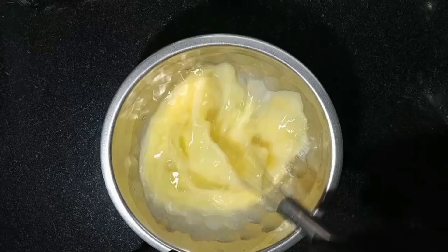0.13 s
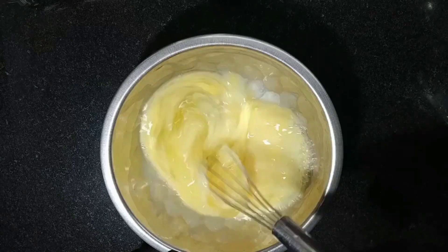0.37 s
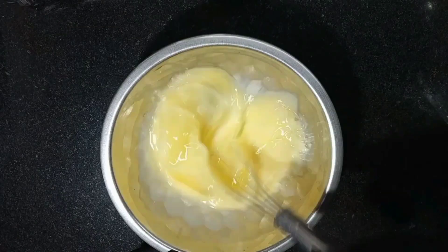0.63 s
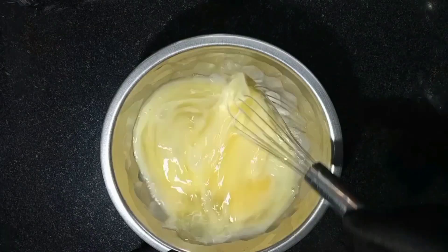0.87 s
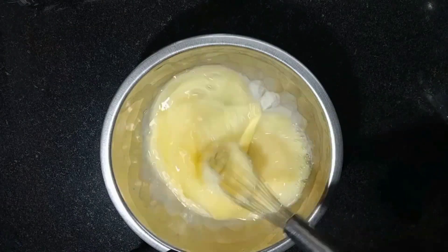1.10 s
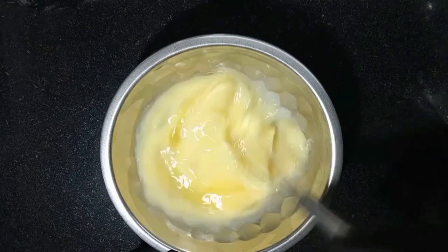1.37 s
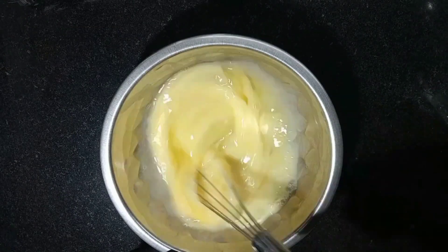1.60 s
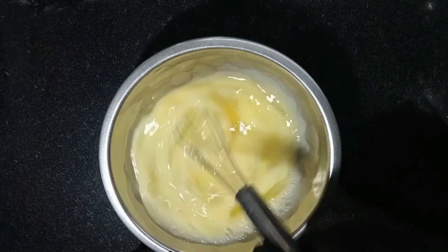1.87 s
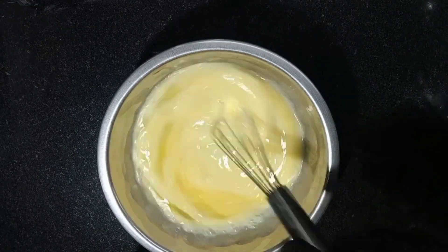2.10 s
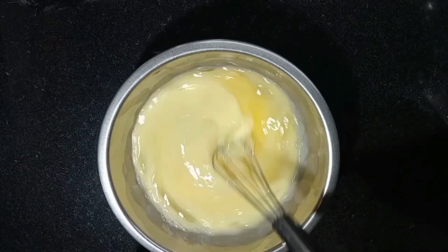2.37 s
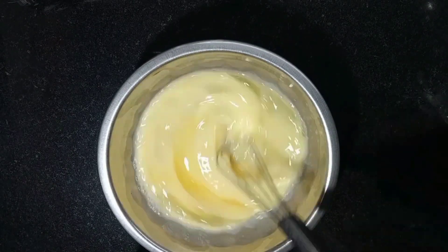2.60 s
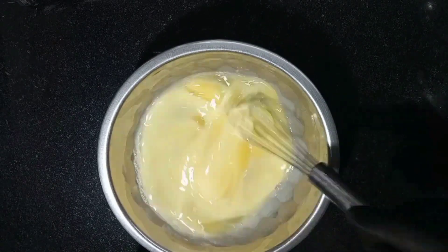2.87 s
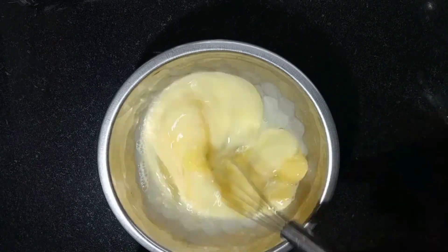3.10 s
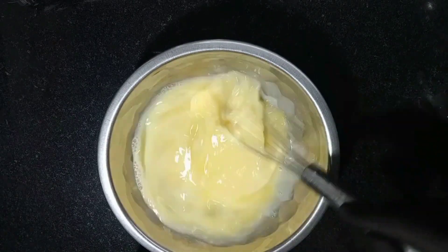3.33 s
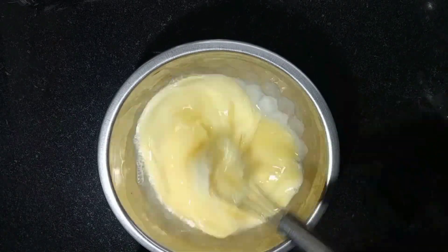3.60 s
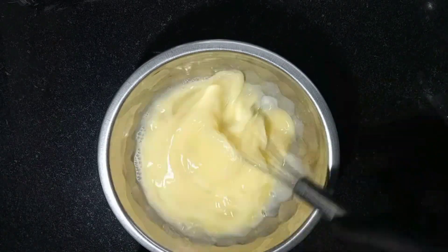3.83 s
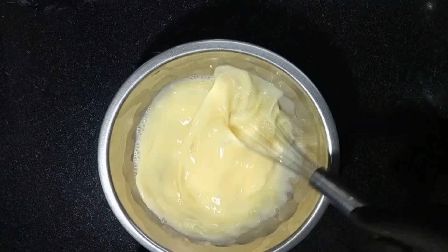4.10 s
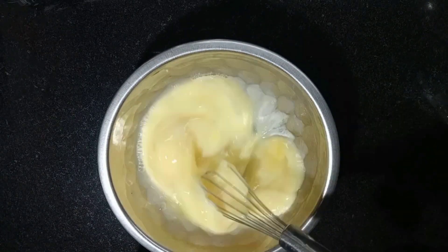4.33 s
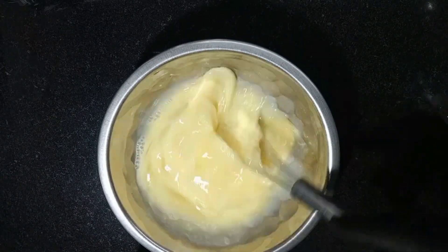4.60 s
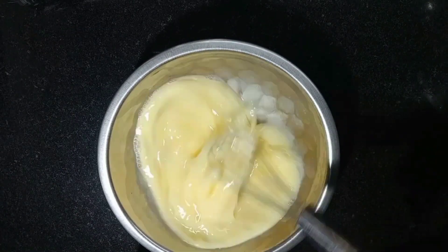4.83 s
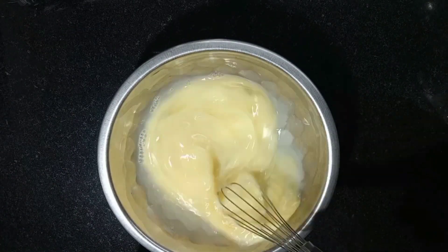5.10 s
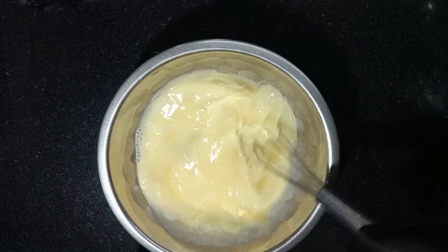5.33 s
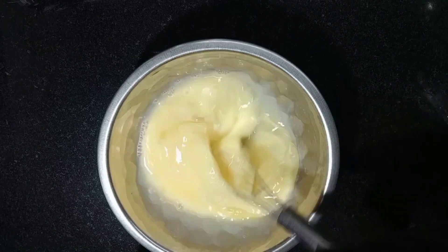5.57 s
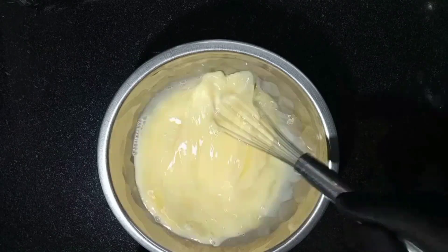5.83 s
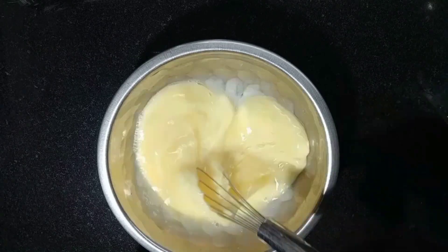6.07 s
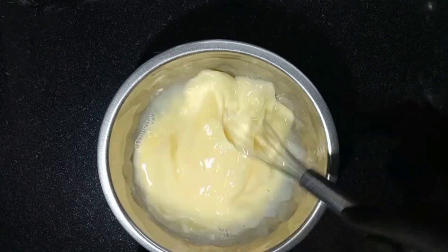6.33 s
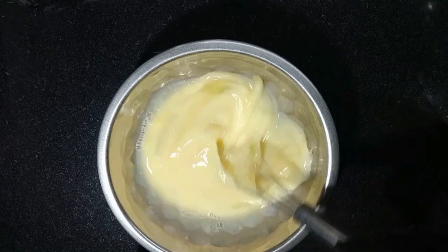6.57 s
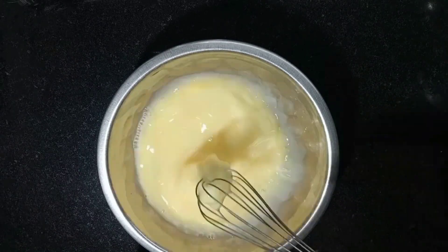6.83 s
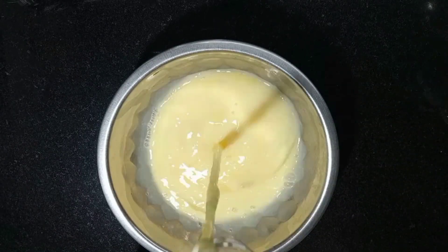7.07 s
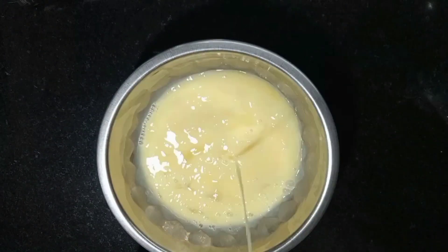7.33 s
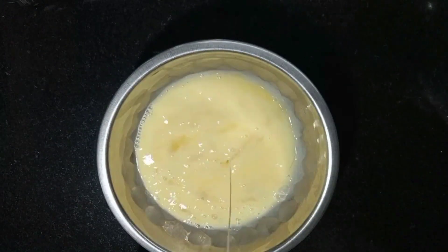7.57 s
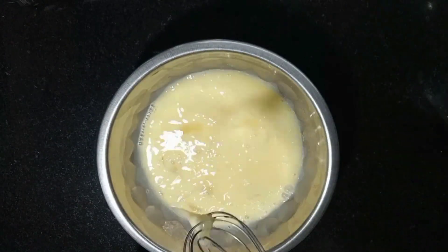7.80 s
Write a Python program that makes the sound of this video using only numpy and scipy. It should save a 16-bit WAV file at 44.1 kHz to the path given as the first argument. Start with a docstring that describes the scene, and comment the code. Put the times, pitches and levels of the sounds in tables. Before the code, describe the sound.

One nearby microphone hears uneven whisk strokes landing and dragging on a thin metal bowl, bright and rattling, mixed with short liquid pops and fine bubbling. Stirring stops for most of a second, returns firmly, then fades as the whisk is lifted. Faint handling, tiny wire ticks and a brief high hiss close it, with a short small-room tail throughout.

```python
"""In a small kitchen, a wire whisk beats eggs in a metal bowl. In each stroke the wires land and drag over
the wall; uneven bursts of noise ring the bowl's modes. Trapped air pockets plop as short sine tones and
froth bursts as tiny grains. The room answers each of them with a short tail of fading noise.
Below lie a growing hum, room noise, a rumble and a rustle that follow the stirring. At the end the whisk
is lifted: soft rustles, a few ticks and a brief hiss remain."""
import sys
import numpy as np
from scipy import signal
from scipy.fft import rfft, irfft
from scipy.io import wavfile
from scipy.ndimage import uniform_filter1d

SR = 44100
rng = np.random.default_rng(int(sys.argv[2]) if len(sys.argv) > 2 else 0)


def amplitude_ratio(level_db):
    """Convert a level in decibels to the matching linear amplitude (field) ratio."""
    exponent = np.asarray(level_db, float) / 20
    return 10 ** exponent


def materialize(psi):
    """Save the field psi as 16-bit PCM at rate SR to the path in sys.argv[1].

    A 1-D psi becomes a single channel; in a 2-D psi each row is a channel.
    """
    bounded = np.clip(np.atleast_2d(psi).T, -1, 1)
    quanta = np.round(bounded * 32767).astype(np.int16)
    wavfile.write(sys.argv[1], SR, quanta)


N = 350154

# Strokes of the whisk. Each row: start in seconds, peak level in dB, time the wires stay on the wall in seconds.
STROKES = [(0.0034, -31.5, 0.033), (0.11, -17.5, 0.033), (0.2753, -22, 0.029), (0.3052, -20.5, 0.038),
           (0.593, -20.5, 0.051), (0.7572, -27, 0.052), (0.837, -38, 0.045), (0.8981, -17, 0.062),
           (1.05, -23, 0.041), (1.2031, -19.5, 0.058), (1.354, -26, 0.035), (1.4904, -15, 0.038),
           (1.704, -30.5, 0.072), (1.7539, -25.5, 0.034), (1.8441, -38, 0.039), (1.907, -34.5, 0.81),
           (1.9703, -28.5, 0.04), (2.008, -34.5, 0.08), (2.1575, -36, 0.058), (2.38, -45.5, 0.028),
           (3.046, -26, 0.08), (3.2023, -27, 0.068), (3.3595, -19.5, 0.043), (3.4999, -13, 0.056),
           (3.6574, -23.5, 0.058), (3.8191, -23, 0.06), (3.844, -24, 0.025), (3.9715, -22, 0.057),
           (4.1112, -24, 0.026), (4.123, -23, 0.047), (4.15, -25, 0.035), (4.278, -18, 0.033),
           (4.3052, -23.5, 0.019), (4.371, -40.5, 0.11), (4.424, -21.5, 0.053), (4.5767, -20.5, 0.056),
           (4.734, -15.5, 0.055), (4.8865, -17.5, 0.027), (4.8991, -23.5, 0.069), (5.0441, -21.5, 0.032),
           (5.1434, -36.5, 0.02), (5.359, -31, 0.032), (5.667, -18, 0.036), (5.826, -23.5, 0.079),
           (5.8387, -16.5, 0.022), (5.9943, -17, 0.024), (6.028, -28, 0.03), (6.1752, -26.5, 0.041),
           (6.3647, -34, 0.068), (6.501, -33, 0.041), (6.5344, -33.5, 0.03), (6.8196, -44, 0.031)]
# Single wires touching the wall. Each row: start in seconds, peak level in dB.
TICKS = [(0.1046, -26), (0.232, -38), (0.417, -51.5), (0.5351, -27), (0.555, -48), (0.587, -42),
         (0.714, -44.5), (1.0346, -41), (1.1699, -31.5), (1.6631, -37), (2.576, -60), (2.612, -65),
         (2.81, -56), (2.886, -55), (3.081, -32), (3.346, -31.5), (3.8105, -39), (4.526, -39),
         (4.5627, -23.5), (4.6783, -33), (4.836, -35.5), (5.188, -33), (5.207, -34.5), (5.221, -43),
         (5.3022, -40.5), (5.34, -30), (5.413, -43), (5.4968, -41), (5.5518, -43.5), (5.938, -50),
         (6.0867, -45), (6.237, -46), (6.413, -54), (6.4929, -38), (6.5956, -50.5), (6.8392, -45),
         (7.319, -49.5), (7.358, -53), (7.5642, -41), (7.742, -54)]
# Where the wires meet the bowl, over time. Each row: time in seconds, bottom ring against the wall in dB,
# brightness in dB per octave.
BOWL_CONTACT = [(0.1, -20, 0.64), (1.8, -20.5, 1.5), (3.05, -19, 1.5), (5.2, -22, -1), (5.7, -18.5, -0.06)]
# Air pockets closing in the batter. Each row: start in seconds, level in dB, starting pitch in Hz.
AIR_POCKETS = [(0.115, -42, 478), (0.2474, -26.5, 1340), (0.462, -36.5, 2700), (0.697, -33.5, 1730),
               (0.8985, -19.5, 1806), (1.17, -13, 2824), (1.203, -31, 1690), (1.3212, -18.5, 3386),
               (1.452, -32, 2750), (3.666, -16, 1763), (3.914, -35, 1850), (4.1088, -20, 1413),
               (4.413, -27.5, 1100), (4.5618, -17.5, 1430), (4.7293, -14, 1050), (4.837, -20.5, 1404),
               (4.8902, -13, 1034), (5.0445, -24.5, 990), (5.147, -32.5, 1082), (5.59, -30, 2800),
               (5.667, -34, 487), (5.777, -33.5, 1700), (5.827, -21, 1168), (6.112, -39.5, 1730),
               (6.188, -26, 1143), (6.289, -38.5, 1710), (6.77, -28, 2860)]
# Low ringing modes of the bowl's bottom. Each row: pitch in Hz, strength in dB.
BOTTOM_MODES = [(470, -3), (576, -6), (620, -1), (920, 5.5)]
# Ringing modes of the wall and the wires. Each row: pitch in Hz, strength in dB.
WALL_MODES = [(1346, -3.5), (1668, 0.5), (2167, -3.5), (2500, -3), (2800, 0), (4030, -0.5), (4450, 1.5),
              (4970, -6), (6115, 6)]
# Colour of wire scraping on metal. Each row: frequency in Hz, relative level in dB per Hz.
SCRAPE_COLOUR = [(60, -69), (240, -37), (500, -19), (1200, -14), (2740, -1.5), (3620, -10), (5090, -7),
                 (6300, -16), (8000, -22), (12900, -17.5), (15600, -28.5), (16300, -57.5)]
# Colour of the room noise. Each row: frequency in Hz, relative level in dB per Hz.
ROOM_COLOUR = [(25, -46.5), (65, -37), (120, -10), (190, -3), (350, -18.5), (1200, -23), (3000, -29.5),
               (6500, -38), (9000, -50), (12800, -45), (16000, -55.5)]
# Colour of the soft rustle, before the bowl adds its own. Each row: frequency in Hz, relative level in dB per Hz.
RUSTLE_COLOUR = [(290, -32.5), (500, -9.5), (800, 6), (1500, -6.5), (2600, -4.5), (4500, -9), (7000, -33),
                 (15000, -42)]
# Strength of the hum over time. Each row: time in seconds, rms level in dB.
HUM_LEVEL = [(0, -103), (4.4, -80), (5.5, -73)]
# How long the kitchen's answer lasts. Each row: frequency in Hz, time to fall 60 dB in seconds.
ROOM_FADE = [(300, 0.42), (2100, 0.2), (14600, 0.15)]
# Soft handling sounds as the whisk is lifted. Each row: centre in seconds, width in seconds,
# rumble level in dB, rustle level in dB.
HANDLING_SOUNDS = [(6.8, 0.085, -68.5, -71.5), (7.3, 0.042, -69, -67.5), (7.461, 0.046, -68.5, -73),
                   (7.66, 0.039, -59, -63)]

LENGTH = 12288  # longest time for one sound and its tail, in samples


def unit(x):
    """Scale each row to rms 1."""
    return x / np.sqrt(np.mean(np.abs(x) ** 2, -1, keepdims=True) + 1e-20)


def per_loudest(x):
    """Scale each row so that its loudest 6 ms have rms 1."""
    return x / np.sqrt(uniform_filter1d(x ** 2, 256, 1).max(1, keepdims=True))


def along(points, hz):
    """Read a curve of (Hz, value) points on a log frequency axis."""
    f, v = np.transpose(points)
    return np.interp(np.log(hz + 1), np.log(f + 1), v)


def curves(rows):
    """Give one value per sample for each column after the time."""
    s, *cols = np.transpose(rows)
    return [np.interp(np.arange(N) / SR, s, c) for c in cols]


def causal(gain):
    """Minimum-phase response: a filter with this gain that reacts as early as it can."""
    cep = irfft(np.log(gain + 1e-6))
    half = len(cep) // 2
    cep[1:half] *= 2
    cep[half + 1:] = 0
    return np.exp(rfft(cep))


def ringing(modes, width_hz, hz, count, scatter_db, detune):
    """One resonance response per contact; the moving batter gives each mode a new strength and pitch."""
    size, sign, shift = rng.standard_normal((count, len(modes), 3)).T[..., None]
    centre, db = np.transpose(modes)[..., None, None]
    gain = amplitude_ratio(db + scatter_db * size) * np.sign(sign)
    centre = centre * (1 + detune * shift)
    damping = 1j * hz * width_hz
    return sum(g * damping / (f * f - hz * hz + damping) for g, f in zip(gain, centre))


def noise(spectrum, patchy_db):
    """Coloured noise of rms 1; smoothed random gains make patches in time and pitch."""
    hz, _, z = signal.stft(rng.standard_normal(N + SR), SR, nperseg=2048)
    field = uniform_filter1d(uniform_filter1d(rng.standard_normal(z.shape), 12, 0), 3, 1)
    z = z * amplitude_ratio(patchy_db * field / field.std() + along(spectrum, hz)[:, None])
    return unit(signal.istft(z, SR, nperseg=2048)[1][:N])


def tails(count):
    """Fresh draws of the kitchen's answer, energy 1: noise in which each frequency dies at its own speed."""
    hz, t, z = signal.stft(rng.standard_normal((count, LENGTH)), SR, nperseg=256)
    z = z * amplitude_ratio(-60 * t / along(ROOM_FADE, hz)[:, None])
    tail = signal.istft(z, SR, nperseg=256)[1][:, :LENGTH]
    tail = tail / np.linalg.norm(tail, axis=1, keepdims=True)
    return np.roll(tail, 200, 1)  # first walls a few ms late


def placed(times, sounds, wet_db):
    """Put each sound at its time, with its own room tail."""
    answer = irfft(rfft(sounds) * rfft(tails(len(sounds))), LENGTH)
    heard = sounds + amplitude_ratio(wet_db) * answer
    out = np.zeros(N + LENGTH)
    for s, sound in zip(times, heard):
        out[round(s * SR):][:LENGTH] += sound
    return out[:N]


def effort():
    """Recent stroke power in dB over its usual value; it lingers because the batter keeps moving."""
    settle_s = 0.17  # time constant, as amplitude
    s, db, _ = np.transpose(STROKES)
    power = np.bincount((s * SR).astype(int), amplitude_ratio(2 * db), minlength=N)
    recent = signal.lfilter([1], [1, -np.exp(-2 / (settle_s * SR))], power)
    recent_db = 10 * np.log10(uniform_filter1d(recent, SR // 4) + 1e-12)
    return recent_db - np.median(recent_db)


def kitchen():
    """Hum and room noise; a rumble through the counter and a rustle, coloured by the bowl, follow the stirring."""
    rumble_db, rustle_db = -68.5, -72  # levels at usual effort
    t = np.arange(N) / SR
    s, width, low_db, soft_db = np.transpose(HANDLING_SOUNDS)[:, :, None]
    swell = np.exp(-.5 * ((t - s) / width) ** 2)
    stir = amplitude_ratio(0.31 * effort())  # dB of level per dB of effort
    hum = np.sqrt(2) * amplitude_ratio(curves(HUM_LEVEL)[0]) * np.sin(2 * np.pi * 150.7 * t)

    rumble = noise([(120, -25.5), (200, -9.5), (350, -2.5), (800, -44.5)], patchy_db=5.5)
    rumble *= amplitude_ratio(rumble_db) * stir + (amplitude_ratio(low_db) * swell).sum(0)

    hz = np.fft.rfftfreq(N, 1 / SR)
    bowl = 1 + 2.1 * ringing(WALL_MODES, 77, hz, count=1, scatter_db=1, detune=0)[0]
    rustle = unit(irfft(rfft(noise(RUSTLE_COLOUR, patchy_db=2.5)) * bowl, N))
    rustle *= amplitude_ratio(rustle_db) * stir + (amplitude_ratio(soft_db) * swell).sum(0)

    # a brief high hiss at the end
    hiss = noise([(11000, -41), (12200, 3.5), (14000, -3.5), (15500, -40)], patchy_db=2)
    hiss *= amplitude_ratio(-77) * np.exp(-.5 * ((t - 7.895) / .022) ** 2)
    return hum + hiss + rumble + rustle + amplitude_ratio(-69.0) * noise(ROOM_COLOUR, patchy_db=4.0)


def froth(count=900):
    """Small bubbles burst at random in the wake of each stroke, louder after firm ones."""
    which, lag, pitch, size, life = rng.random((count, 5)).T[:, :, None]
    s, db, _ = np.transpose(STROKES)[:, (which * len(STROKES)).astype(int)]
    start = ((s - .11 * np.log(lag)) * SR).astype(int)  # 0.11 s after the stroke on average
    hz = 1700 * 8.5 ** pitch
    k = np.arange(1024)
    size_db = .7 * db - 28 + .5 * along(SCRAPE_COLOUR, hz) + np.minimum(-6 * np.log(size), 12)
    cycles = 7 + 40 * life ** 2  # a bubble falls 60 dB in this many cycles
    fade = amplitude_ratio(-60 * k / SR * hz / cycles) * (1 - np.exp(-k / 14))
    waver = np.cumsum(rng.normal(0, .09, (count, len(k))), 1)  # a wet film wavers in pitch
    grains = amplitude_ratio(size_db) * fade * np.sin(2 * np.pi * hz * k / SR + waver)
    bursts = np.bincount((start + k).ravel(), grains.ravel(), minlength=N)[:N]
    return bursts + amplitude_ratio(-9) * signal.fftconvolve(bursts, tails(count=1)[0])[:N]


def plops():
    """A pocket of air rings as it closes; its pitch rises a little and a weaker neighbour rings with it."""
    s, db, hz = np.transpose(AIR_POCKETS)[:, :, None]
    t = np.arange(LENGTH) / SR
    phase = 2 * np.pi * hz * (t + 0.37 * np.minimum(t, .03) ** 2)  # the rise lasts 30 ms
    waver = uniform_filter1d(rng.standard_normal(phase.shape), size=48, axis=1)
    phase += np.cumsum(waver, 1) * hz * 3e-5  # the wet walls waver
    ratio, share = rng.random((len(s), 2)).T[:, :, None]
    tone = np.sin(phase) + .45 * share * np.sin((1.12 + .3 * ratio) * phase)
    life = 0.0077 + 25 / hz  # seconds to fall 60 dB: large pockets ring longer
    envelope = amplitude_ratio(db - 60 * t / life) * (1 - np.exp(-t / 0.0015))
    return placed(s[:, 0], envelope * tone, wet_db=-7)


def whisk():
    """Wires land in a burst, then chatter over the dimpled wall until they leave; that force rings wall and bottom."""
    tick_s, tick_bright_db = 0.022, -0.5  # a tick's time on the wall; its extra brightness per octave
    crest_db = 9  # peak of a contact over its loudest 6 ms
    contacts = STROKES + [(*tick, tick_s) for tick in TICKS]
    s, db, drag = np.transpose(contacts)[:, :, None]
    count = len(s)
    t, hz = np.arange(LENGTH) / SR, np.fft.rfftfreq(LENGTH, 1 / SR)

    bottom_db, bright_db = (c[(s * SR).astype(int)] for c in curves(BOWL_CONTACT))
    bright_db[len(STROKES):] += tick_bright_db + rng.standard_normal((len(TICKS), 1))
    bottom_db[len(STROKES):] -= 6  # one wire hardly moves the bottom

    # each wire colours its own moment
    luck = rng.standard_normal((count, 2, LENGTH))
    z = signal.stft(luck[:, 1], nperseg=256)[2]
    wires = uniform_filter1d(uniform_filter1d(rng.standard_normal(z.shape), 3, 1), 3, 2)
    rub = signal.istft(z * amplitude_ratio(5.04 * wires / wires.std()), nperseg=256)[1][:, :LENGTH]

    lumps = unit(uniform_filter1d(luck[:, 0], 60, 1))  # single wires catch and slip every few ms
    passed = t / np.clip(drag, .002, .16)  # share of the time on the wall, held to 0.16 s at most
    stay = amplitude_ratio(-7 * passed - 8.9 * passed ** 4)
    # the first wires strike close together, harder in firm strokes
    landing = 3.01 * amplitude_ratio(1.9 * lumps[::-1] + 0.18 * (db + 21) - 60 * t / 0.026)
    onset = 1 - np.exp(-t / (0.018 * drag))  # long drags start softer
    force = rfft(rub * (amplitude_ratio(4.04 * lumps) * stay + landing) * onset)

    tilt = amplitude_ratio(bright_db * np.log2(np.clip(hz, 700, 12000) / 3000))
    scrape = causal(amplitude_ratio(along(SCRAPE_COLOUR, hz)))
    wall_ring = ringing(WALL_MODES, 100, hz, count, scatter_db=3, detune=.025)
    wall = irfft(force * tilt * scrape * (0.75 + 1.33 * wall_ring))
    bottom = irfft(force * ringing(BOTTOM_MODES, 22, hz, count, scatter_db=3, detune=.006))
    sounds = amplitude_ratio(db - crest_db) * (per_loudest(wall) + amplitude_ratio(bottom_db) * per_loudest(bottom))
    return placed(s[:, 0], sounds, wet_db=-8.5)


def scene():
    """Everything reaches one microphone."""
    return (whisk() + plops() + froth() + kitchen())[None]


def top_cut(x):
    """Nothing passes above the cut-off."""
    return signal.sosfilt(signal.butter(12, 16640, fs=SR, output="sos"), x)


def record(dry):
    """Turn the finished mix into the sound that is saved."""
    return top_cut(dry)


dry = scene()
out = record(dry)
materialize(out)
```